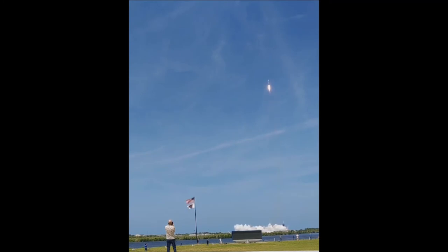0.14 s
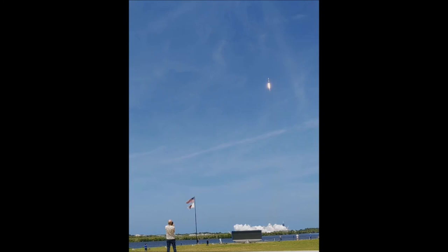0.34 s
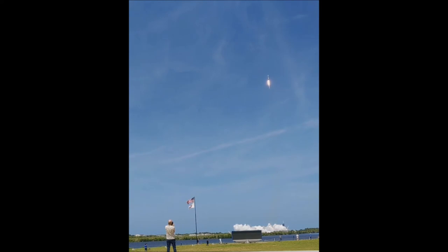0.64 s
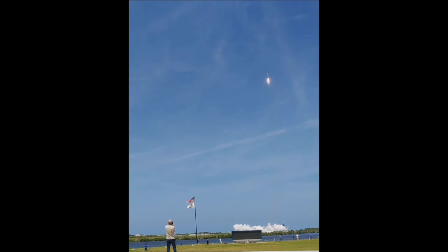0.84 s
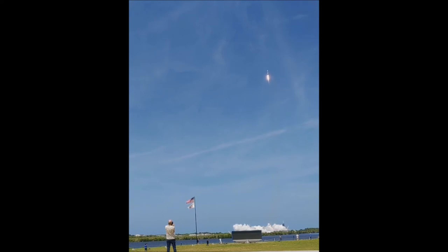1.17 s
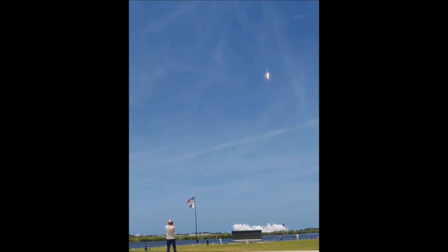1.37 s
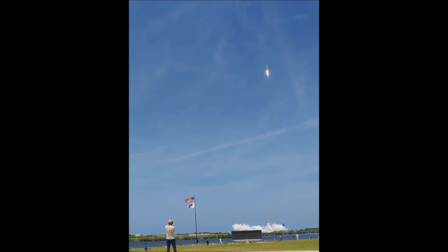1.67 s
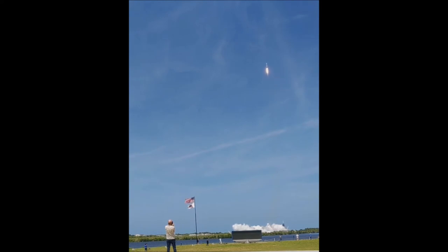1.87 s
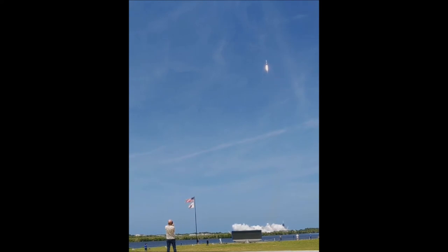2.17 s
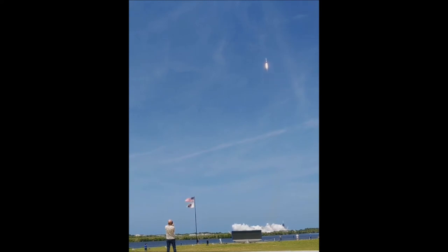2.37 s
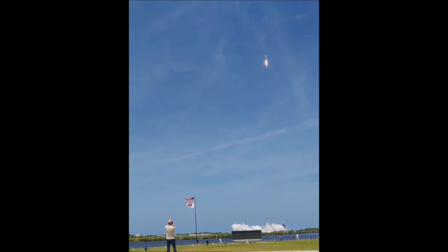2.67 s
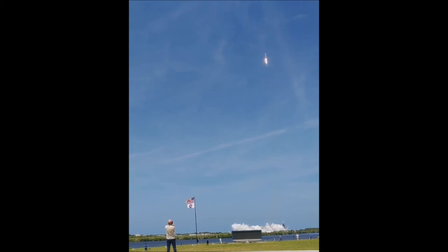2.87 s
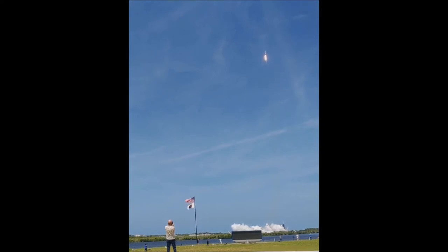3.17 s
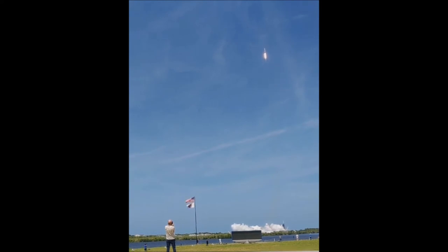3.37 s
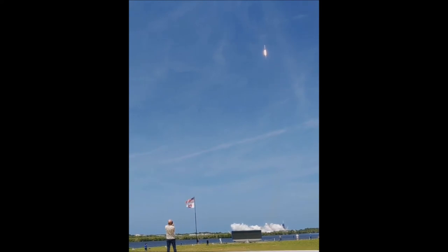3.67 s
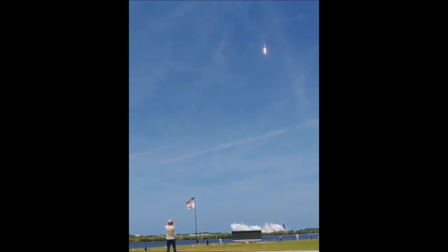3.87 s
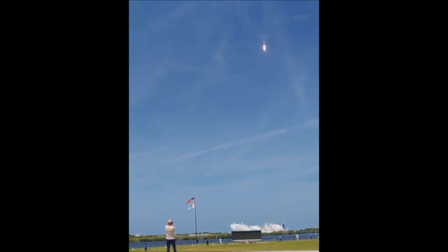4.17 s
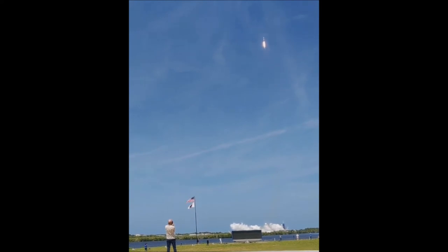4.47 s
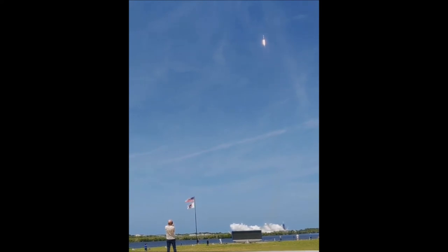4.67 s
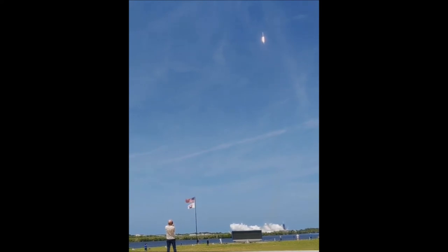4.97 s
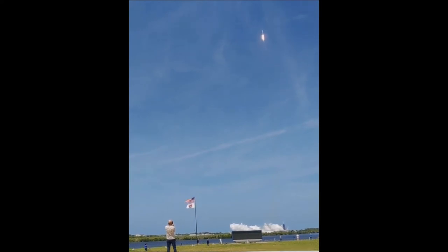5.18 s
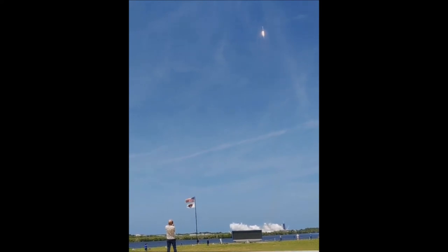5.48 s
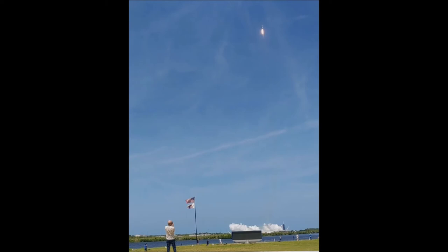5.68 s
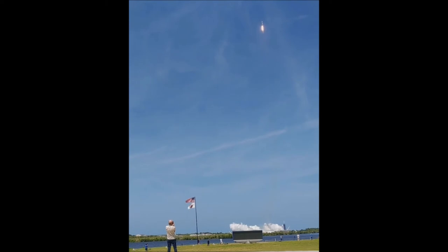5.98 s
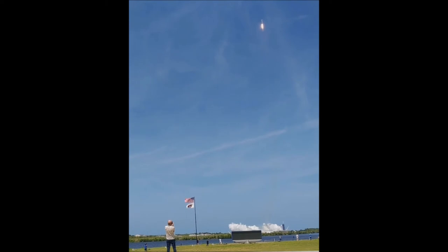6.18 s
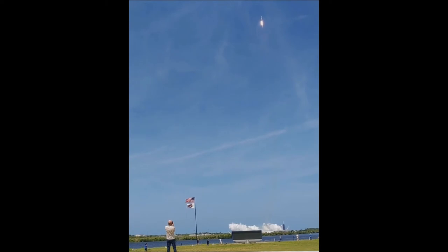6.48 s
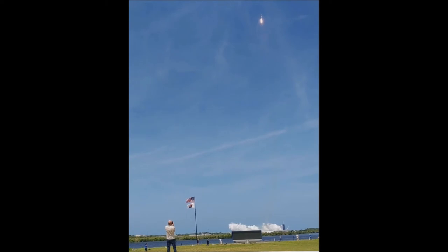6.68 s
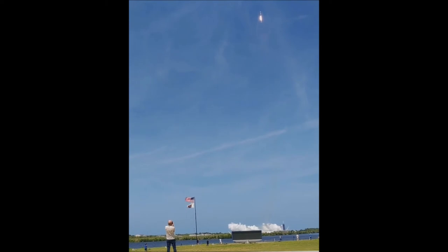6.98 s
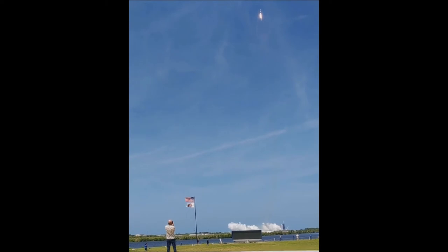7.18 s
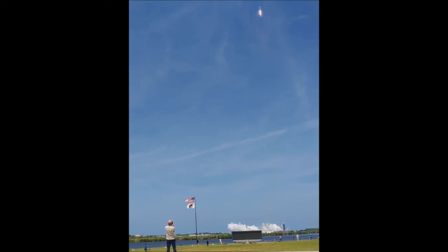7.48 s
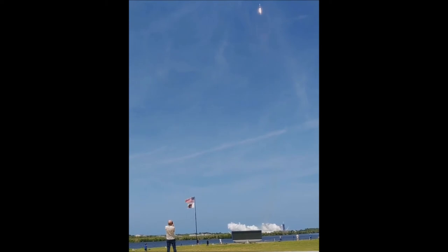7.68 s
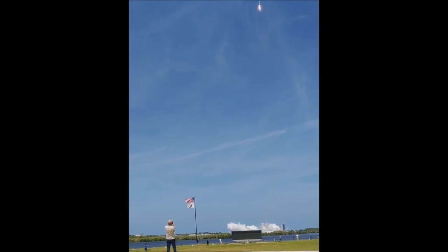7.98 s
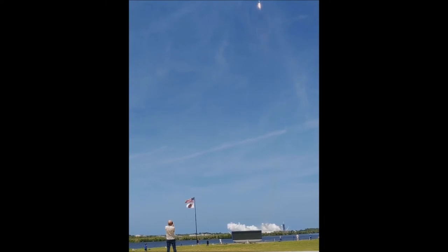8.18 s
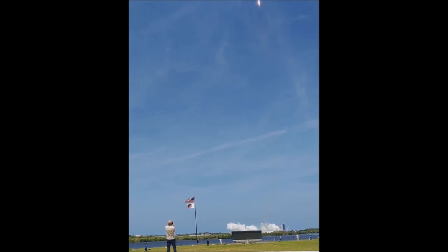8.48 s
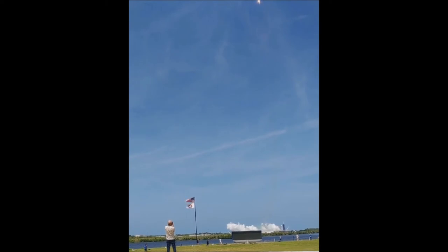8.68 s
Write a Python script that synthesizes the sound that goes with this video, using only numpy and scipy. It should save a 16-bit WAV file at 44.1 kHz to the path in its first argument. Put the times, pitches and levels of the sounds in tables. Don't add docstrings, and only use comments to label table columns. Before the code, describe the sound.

Heavy low-frequency rocket rumble rolls across open ground while dry, tearing crackle builds over it, peaks about six seconds in, then recedes a little.

```python
import sys
import numpy as np
from scipy import signal
from scipy.fft import rfft, irfft, next_fast_len
from scipy.io import wavfile
from scipy.ndimage import uniform_filter1d, minimum_filter1d

SR = 44100
rng = np.random.default_rng(int(sys.argv[2]) if len(sys.argv) > 2 else 0)


def volts_from_decibels(level):
    exponent = np.asarray(level, float) / 20
    return 10 ** exponent


def store_pcm(level_fs):
    pcm = np.round(np.clip(level_fs, -1, 1) * 32767).astype(np.int16)
    wavfile.write(sys.argv[1], SR, np.atleast_2d(pcm).T)


N = 389844
PULSE_PAIR = np.array([[1], [0.6]])


def evened(x):
    return x / np.sqrt(np.mean(x ** 2) + 1e-20)


def read(points, hz):
    f, value = np.transpose(points)
    return np.interp(np.log(hz + 1), np.log(f + 1), value)


def causal(gain_db):
    ceps = irfft(np.maximum(gain_db, -110) * np.log(10) / 20)
    half = ceps.shape[-1] // 2
    ceps[..., 1:half] *= 2
    ceps[..., half + 1:] = 0
    return irfft(np.exp(rfft(ceps)))


def noise(colour, size, patchy_db):
    hz = np.fft.rfftfreq(size, 1 / SR)
    a, b, c, d, patch = rng.standard_normal((2 * N // size + 3, len(hz), 5), dtype=np.float32).T
    patch = evened(uniform_filter1d(uniform_filter1d(patch, size=6, axis=0), size=3, axis=1))
    gain = volts_from_decibels(read(colour, hz)[:, None] + patchy_db * patch)
    z = np.array([a + 1j * b, c + 1j * d]) * gain
    return evened(signal.istft(z, window="cosine", nperseg=size)[1][:, :N])


# time in seconds, loudness in dB, depth in dB moved from throb to
# lowest rumble, shock strength in dB.
JET_COURSE = [(0, -18.5, 2, -74), (.06, -19, -2.5, -64), (.65, -17.5, 0.5, -63.5), (1.3, -18, -1, -63.5),
              (2.1, -16, 0, -61.5), (2.75, -15.5, -1.5, -56), (3.35, -17, -1.5, -57),
              (3.85, -17.5, -1, -52.5), (4.4, -17, -1.5, -48), (4.95, -17.5, 1.5, -53),
              (5.5, -19, -0.5, -50), (6.1, -11.5, 1.5, -45), (6.27, -13.5, -1, -49),
              (6.47, -17.5, 1.5, -59.5), (6.56, -18.5, -1, -50.5), (7.2, -16.5, 0, -48.5),
              (8.0, -16, 0, -51), (8.84, -18, 3, -52.5)]


def control(column, t):
    return np.interp(t, np.array(JET_COURSE)[:, 0], np.array(JET_COURSE)[:, column])


# frequency in Hz, level in dB.
MICROPHONE_HISS = [(1500, -19), (3000, 0.5), (6000, -9.5), (9000, -4), (16000, -11)]


def microphone_hiss():
    return volts_from_decibels(-83.5) * noise(MICROPHONE_HISS, size=1024, patchy_db=0.0)


# start in seconds, level in dB.
DRY_TICKS = [(0.0044, -55), (0.7602, -55), (2.3263, -58), (2.3389, -45), (2.3474, -58), (2.3577, -55.5),
             (2.406, -56), (3.5104, -49), (5.366, -28), (5.5777, -27), (5.643, -38), (6.25, -46),
             (6.349, -39), (7.4105, -52), (7.856, -51.5), (8.249, -50.5), (8.472, -49.5), (8.66, -54)]


def ticks():
    out = np.zeros((2, N))
    for s, db in DRY_TICKS:
        first = round(s * SR)
        out[:, first:first + 3] += volts_from_decibels(db + 8.5) * np.array([1, -0.6, -0.2])
    return out


# time in seconds, level in dB,
# centre frequency in Hz.
GATHERED_THROB = [(0, -6.5, 125), (1.3, -11.5, 114.8), (2.25, -5.5, 97), (2.7, -3, 122.2), (3.0, 1, 110.1),
                  (3.35, 4, 112), (3.75, 0.5, 128), (4.2, -5, 118), (5.2, -6.5, 108.2), (6, -6, 99.5),
                  (7, -3.5, 117.9), (7.8, -6.5, 104.9), (8.84, -4, 115)]
GATHER_WIDTH_HZ, GATHER_STEADY = 20, 0.6


def gathered(t):
    s, _, hz = np.transpose(GATHERED_THROB)
    a, b = rng.standard_normal((2, 2, N))
    slow = signal.sosfilt(signal.butter(2, GATHER_WIDTH_HZ, fs=SR, output="sos"), a + 1j * b)
    slow /= abs(slow) ** GATHER_STEADY + 1e-9
    turns = np.cumsum(np.interp(t, s, hz)) / SR
    return evened((slow * np.exp(2j * np.pi * turns)).real)


# frequency in Hz, level in dB.
RUMBLE_COLOUR = [(8, -14), (16, -8), (27, 0), (40, -1.5), (55, -8), (80, -22), (300, -77.5), (3000, -140)]
THROB_COLOUR = [(30, -32.5), (55, 2.5), (80, -4), (120, -1.5), (200, -11), (400, -19.5), (900, -57.5),
                (3000, -120)]
RUMBLE_DB, THROB_DB, GATHER_DB = -3, -8.5, -11


def rumble():
    t = np.arange(N) / SR
    loud_db, depth_db = control(column=1, t=t), control(column=2, t=t)
    deep = volts_from_decibels(loud_db + depth_db + RUMBLE_DB) * noise(RUMBLE_COLOUR, size=4096, patchy_db=-0.4)
    deep += volts_from_decibels(loud_db - depth_db + THROB_DB) * noise(THROB_COLOUR, size=4096, patchy_db=0.23)
    gather_db = np.interp(t, *np.transpose(GATHERED_THROB)[:2]) + GATHER_DB
    return deep + volts_from_decibels(loud_db + gather_db) * gathered(t)


# frequency in Hz, level in dB.
ROAR_COLOUR = [(80, -37.5), (200, -1), (300, -2), (600, -12), (1000, -21), (1600, -28), (2200, -35.5),
               (5000, -58), (9000, -110)]
ROAR_DB, ROAR_PER_DEPTH, ROAR_PER_SHOCK = -15.5, -0.12, 0.12


def roar():
    t = np.arange(N) / SR
    shock_db = control(column=3, t=t)
    jumps = volts_from_decibels(1.5 * np.minimum(rng.exponential(1, N), 3)) * (rng.random(N) < 110 / SR)
    colour = causal(read(ROAR_COLOUR, np.fft.rfftfreq(4096, 1 / SR)))
    blunt = evened(signal.oaconvolve(jumps, colour)[:N])
    steep = np.clip((shock_db + 60) / 14, 0, 1)
    mix = (1 - 0.35 * steep) * noise(ROAR_COLOUR, size=1024, patchy_db=1.5)
    mix = mix + (0.32 + 0.29 * steep) * blunt * PULSE_PAIR
    bright = signal.lfilter(*signal.butter(1, 450, "high", fs=SR), mix)
    mix = (1 - 0.94 * steep) * mix + 1.28 * steep * bright
    level_db = control(column=1, t=t) + ROAR_DB + ROAR_PER_DEPTH * control(column=2, t=t)
    return volts_from_decibels(level_db + ROAR_PER_SHOCK * (shock_db + 56.0)) * mix


def leaned(jet):
    lean = 0.22 * np.clip((control(column=3, t=np.arange(N) / SR) + 62.0) / 12, 0, 1)
    square = signal.lfilter(*signal.butter(1, 15, "high", fs=SR), jet[0] ** 2)
    return jet + lean * square * np.array([[1], [0]])


# time in
# seconds, level in dB.
HUMP_ROWS = [(1.021, -5.5), (1.106, -14), (1.1258, -10.5), (1.1453, -9), (1.1561, -8.5), (1.1693, -6),
             (1.178, -9), (1.2108, -6.5), (1.2644, -12.5), (1.321, -10.5), (1.3684, -8),
             (1.4276, -8.5), (1.4386, -10.5), (1.4859, -8), (1.5104, -14.5), (1.53, -14.5),
             (1.5334, -9), (1.6925, -7), (1.6965, -8), (1.779, -8.5), (1.8103, -10.5),
             (1.8429, -14.5), (1.883, -13.5), (1.915, -10), (1.9195, -10), (1.9558, -20.5),
             (1.9958, -11.5), (2.003, -6.5), (2.153, -11.5), (2.172, -16.5), (2.1964, -6.5),
             (2.2589, -7), (2.2807, -16), (2.31, -3.5), (2.3273, -10), (2.39, -12.5), (2.4082, -20.5),
             (2.472, -13.5), (2.5123, -7.5), (2.5418, -14.5), (2.6825, -7.5), (2.6945, -8.5),
             (2.7094, -6), (2.7862, -6.5), (2.7957, -1.5), (2.8302, -9), (2.889, -15), (3.0637, -2.5),
             (3.1316, -10.5), (3.174, -12.5), (3.2079, -7.5), (3.2374, -18), (3.2689, -13.5),
             (3.283, -19), (3.3222, -10.5),
             (3.4113, -11.5), (3.471, -10), (3.4863, -11.5), (3.5303, -11.5), (3.58, -11),
                     (3.5961, -13), (3.6349, -5.5), (3.6796, -7), (3.695, 2), (3.7184, -8), (3.8064, -12),
                     (3.8296, -9), (3.8589, -8.5), (4.1221, -19.5), (4.147, -11), (4.2182, -4.5),
                     (4.2354, -12), (4.257, -4.5), (4.3333, -12), (4.3521, -10), (4.4165, -7),
                     (4.4334, -10.5), (4.4557, -8), (4.477, -14), (4.4839, -4.5), (4.503, -8.5),
                     (4.5201, -2), (4.5872, -5), (4.5984, -9.5), (4.6166, -14), (4.638, -6.5), (4.649, 0.5),
                     (4.6936, -5), (4.7631, -13), (4.7766, -10.5), (4.7938, -19), (4.81, -1.5),
                     (4.833, -6.5), (4.8846, -10.5), (4.8994, -15), (4.9255, -16), (4.9624, -6.5),
                     (4.9825, -8), (4.998, -6.5), (5.0841, -1), (5.125, -11.5), (5.1538, -7),
                     (5.1847, -19.5), (5.2402, -19.5), (5.2872, -11), (5.3576, -15), (5.3788, -8.5),
                     (5.393, -6), (5.415, -6), (5.4232, -13.5), (5.4534, -13),
             (5.488, -16.5), (5.5985, -8.5), (5.6169, -3), (5.656, -17), (5.6764, -6),
                      (5.6822, -2.5), (5.822, -8), (5.8412, -16.5), (5.887, -10), (5.902, -9.5),
                      (5.921, -17.5), (5.9247, -5.5), (5.945, -16.5), (5.974, -3), (6.0173, -8.5),
                      (6.0166, 1.5), (6.0724, -6), (6.0782, -8.5), (6.1005, -7.5), (6.1343, -8),
                      (6.1595, -11), (6.166, -14.5), (6.1752, -9), (6.1811, -4), (6.2226, -6),
                      (6.2279, -14), (6.258, -14.5), (6.2945, -6.5), (6.3264, -9.5), (6.3585, -11.5),
                      (6.3891, -12.5), (6.4194, -10.5), (6.4988, -10), (6.5878, -2.5), (6.5953, -6),
                      (6.677, -18.5), (6.7258, -5.5), (6.9, -18), (6.9293, -4.5), (6.9645, -24.5),
                      (7.156, -15.5), (7.2088, -14.5), (7.247, -9), (7.4914, -17.5), (7.542, -16.5),
                      (7.557, -15.5), (7.5858, -9), (7.8461, -13), (7.9235, -12), (7.9515, -12.5),
                      (8.5853, -11.5)]
HUMP_S, HUMP_BAND_HZ, HUMP_DB, HUMP_DIRECT = 0.0012, [119, 1090], -0.5, 0.76
PULSE_PER_LOUD = 0.58
TWIN_S = 0.00895


def humps():
    s, db = np.transpose(HUMP_ROWS)
    size = volts_from_decibels(db + HUMP_DB + PULSE_PER_LOUD * (control(column=1, t=s) + 19.5))
    train, t = np.zeros(N), np.arange(-1024, 1025) / SR
    np.add.at(train, (s * SR).astype(int), size)
    np.add.at(train, ((s - TWIN_S) * SR).astype(int), HUMP_DIRECT * size)
    band = signal.butter(1, HUMP_BAND_HZ, "band", fs=SR)
    hump = signal.filtfilt(*band, np.exp(-abs(t) / HUMP_S))
    return signal.oaconvolve(train, hump, "same") * PULSE_PAIR


def swings(rows, hz, rise_s, gain_db):
    out, t = np.zeros(N), np.arange(400) / SR
    for (s, db), wide in zip(rows, rng.uniform(0.62, 1.24, len(rows))):
        swing = np.sin(2 * np.pi * hz * wide * t) * t / rise_s * np.exp(1 - t / rise_s)
        loud_db = PULSE_PER_LOUD * (control(column=1, t=s) + 17)
        first = round(s * SR)
        out[first:first + 400] += volts_from_decibels(db + gain_db + loud_db) * swing
    return out * PULSE_PAIR


# start in seconds, level in dB.
KNOCK_ROWS = [(4.397, -22.5), (4.561, -25), (4.614, -14), (4.633, -19.5), (4.689, -22), (4.722, -33),
              (4.856, -29), (4.871, -24), (4.914, -35), (4.998, -23), (5.116, -24), (5.175, -28),
              (5.215, -43), (5.349, -25), (5.358, -25), (5.413, -18), (5.421, -14), (5.453, -13),
              (5.486, -19), (5.507, -23), (5.516, -17), (5.567, -17.5), (5.595, -24), (5.669, -27),
              (5.702, -21.5), (5.716, -21.5), (5.758, -24), (5.765, -20), (5.812, -22), (5.947, -30),
              (6.004, -13), (6.014, -27.5), (6.157, -19), (6.293, -22), (6.341, -27), (6.361, -18),
              (6.492, -24), (6.578, -36), (6.586, -31), (6.703, -27), (6.758, -18), (6.793, -24),
              (6.8, -18), (6.963, -24), (7.024, -28), (7.157, -21), (7.205, -33.5)]


def knocks():
    return swings(KNOCK_ROWS, hz=800, rise_s=0.0011, gain_db=-4)


# start in seconds, level in dB.
SNAP_ROWS = [(4.7238, -23.5), (4.808, -22), (4.881, -21), (4.8967, -18), (4.9965, -20), (5.0335, -27),
             (5.0819, -22), (5.124, -27), (5.1824, -24), (5.235, -21), (5.2774, -31), (5.2838, -24),
             (5.652, -32), (5.7724, -27), (5.888, -27), (6.069, -19.5), (6.6697, -27), (6.8296, -26),
             (7.035, -29), (7.2906, -30), (7.4774, -22), (7.705, -28), (7.7242, -20), (7.92, -31),
             (8.0315, -25), (8.093, -25), (8.1913, -23), (8.4976, -26)]


def snaps():
    return swings(SNAP_ROWS, hz=1350, rise_s=0.00054, gain_db=-0.5)


# frequency in Hz, gain in dB.
PORT_COLOUR = [(800, -2.5), (1500, -0.5), (2100, -4), (2600, -1), (3400, 0), (4700, -6), (5300, -1),
               (5850, 1.5), (6350, -7), (7600, -6), (8600, -14.5), (9500, -12), (10500, -18), (16000, -21)]


def crackle():
    clump = evened(uniform_filter1d(uniform_filter1d(rng.standard_normal(N), size=900), size=900))
    size = volts_from_decibels(1.2 * np.minimum(rng.exponential(1, N), 4) + 0.5 * clump)
    train = size * (rng.random(N) < 260 / SR)
    keep = volts_from_decibels(-120 / (0.15 * SR))
    envelope = np.sqrt(signal.lfilter([1 - keep], [1, -keep], train ** 2))
    hiss = envelope * rng.standard_normal((2, N))
    field = evened(train * PULSE_PAIR + volts_from_decibels(8.0) * hiss)
    hz, t, z = signal.stft(field, SR, nperseg=256)
    slope_db = read([(300, -22.0), (900, 11.0), (3000, 8.5), (8000, -0.5)], hz) + read(PORT_COLOUR, hz)
    top = read([(3500, 0.037), (9000, 0.82)], hz)[:, None]
    level_db = control(column=3, t=t)
    top_db = 1.04 * (level_db + 49.0) - 3.0
    z *= volts_from_decibels(slope_db[:, None] + level_db + 2.5 + top * top_db)
    return signal.istft(z, SR, nperseg=256)[1][:, :N]


# time in seconds, crack in dB, edge in dB relative to it, body in dB relative to it.
SHOCK_ROWS = [(0.146, -45, -29.5, 1), (0.27, -43.5, -34, 19), (0.402, -46.5, -34, 14),
              (0.5196, -44, -21, 12), (0.878, -44.5, -31, 21), (0.9776, -44.5, -31, 14),
              (1.1392, -44.5, -25, 13), (1.424, -48, -10, 21), (2.1963, -43, -29.5, 15.5),
              (2.3793, -55.5, -18.5, 9), (2.5948, -53, -27, 4), (2.6297, -43, -37, 15.5),
              (2.87, -44.5, -33, 11), (2.994, -42.5, -41, 9), (3.063, -43.5, -26, 3.5),
              (3.2193, -40.5, -43, 9), (3.237, -44, -44, 1), (3.4133, -39, -32, 2),
              (3.441, -40.5, -30, 12), (3.4658, -40, -38, 3.5), (3.6988, -37.5, -31, 10.5),
              (3.7414, -41.5, -33, 1.5), (3.8035, -40.5, -36, 7), (3.8287, -39.5, -39, 6.5),
              (3.87, -39, -35, 7), (3.9, -39, -32, 9), (3.9299, -39, -28, 5.5), (4.014, -55.5, -28, -7),
              (4.095, -51, -20, -9), (4.1195, -38.5, -23, 2.5),
              (4.2148, -35.5, -29, 1), (4.2339, -33.5, -39, 3.5), (4.2868, -31, -23, -4),
                  (4.3975, -28, -29, 0), (4.4687, -35, -40, 10.5), (4.5225, -26, -27, -1.5),
                  (4.6193, -24, -28, 5.5), (4.6357, -27.5, -20, -6), (4.6899, -27, -16, -8.5),
                  (4.7257, -36.5, -31, 4.5), (4.8245, -38, -36, 11), (4.8817, -27.5, -29, 4),
                  (4.8965, -32, -23, 10.5), (4.9235, -28, -23, 10), (4.962, -38.5, -31, 11),
                  (4.9954, -31, -27, -1), (5.084, -26.5, -18, -10.5), (5.1229, -36.5, -23, 10.5),
                  (5.153, -38.5, -27, 5), (5.1834, -29, -21, -0.5), (5.217, -24, -22, -4),
                  (5.2367, -26, -14, -2.5), (5.2852, -35, -21, 1.5), (5.3575, -24.5, -13, 2),
                  (5.377, -25.5, -14, 5), (5.3904, -35.5, -15, 4.5), (5.42, -31, -7, -7),
                  (5.4556, -27, -15, -10), (5.49, -34, 0, -7), (5.5181, -27, -16, -8.5),
              (5.5384, -35, -9, 5), (5.5696, -22, -9, -11), (5.5955, -29.5, -10, 5),
                    (5.6176, -30, -10, 7.5), (5.6558, -34.5, -17, 10.5), (5.6932, -36, -17, 7),
                    (5.726, -39.5, -30, 16.5), (5.7733, -23.5, -18, -10.5), (5.8225, -26, -24, -0.5),
                    (5.9072, -30, -32, 8), (5.9206, -32, -36, 12), (5.969, -30.5, -34, 9.5),
                    (6.0128, -15.5, -15, -5.5), (6.0712, -24, -24, 1), (6.102, -22, -32, 11),
                    (6.1641, -23.5, -30, 2), (6.1753, -25, -28, 3.5), (6.229, -35.5, -28, 11),
                    (6.3639, -27.5, -26, 3), (6.4901, -27.5, -18, -2.5), (6.4972, -23, -15, -12.5),
                    (6.5288, -33.5, 5, -21), (6.588, -25, -19, 3), (6.6323, -31.5, -12, 0.5),
                    (6.6719, -26.5, -23, -6.5), (6.7151, -31, -23, 3), (6.802, -28, -30, -2),
                    (6.839, -34.5, -31, 8), (6.8968, -32.5, -26, 3.5), (6.964, -31, -31, 0),
                    (6.9882, -34, -39, 8.5), (7.037, -38.5, -40, 18),
              (7.0948, -28, -34, 5), (7.1683, -34.5, -32, 8), (7.2161, -30, -37, 14),
                   (7.2341, -31.5, -34, 5), (7.2683, -33.5, -30, 6), (7.3011, -27.5, -22, 0.5),
                   (7.403, -41.5, -23, 10), (7.4909, -25, -23, 6.5), (7.541, -35, -31, 15),
                   (7.653, -34.5, -31, -9), (7.7243, -32.5, -41, 3.5), (7.8092, -39.5, -29, 6.5),
                   (7.9188, -38, -43, 14), (7.9902, -40, -21, -7), (8.0402, -30, -38, -4),
                   (8.1016, -32.5, -27, 4), (8.1742, -29.5, -36, -3), (8.1943, -24, -37, -4),
                   (8.2326, -35, -19, 5.5), (8.285, -32, -32, -1), (8.362, -27.5, -41, -7),
                   (8.4261, -32.5, -34, 1.5), (8.497, -39.5, -31, 2), (8.547, -34, -42, -0.5),
                   (8.5771, -27.5, -41, -0.5), (8.595, -27.5, -30, 5.5), (8.6406, -39, -19, 6.5),
                   (8.68, -32, -29, 1), (8.7243, -31.5, -30, -2.5), (8.774, -31.5, -33, -6.5)]
DIRECT_DB, DIRECT_THUD_DB, DIRECT_EDGE_DB, DIRECT_HISS_DB = -5.5, 2.5, -1, -8
THUD_DB, THUD_SHARE, THUD_TOP_DB = 3.5, 0.79, -22.5


def arrivals():
    rows = SHOCK_ROWS
    s, crack_db, edge_db, body_db = np.tile(np.transpose(rows), 2)
    direct = np.repeat([1, 0], len(rows))
    crack_db = crack_db + DIRECT_DB * direct
    thud_db = THUD_DB + THUD_SHARE * body_db + DIRECT_THUD_DB * direct
    thud_db = np.minimum(thud_db, THUD_TOP_DB - crack_db)
    edge_db = edge_db + 2.5 + DIRECT_EDGE_DB * direct
    return s - TWIN_S * direct, crack_db, thud_db, edge_db, DIRECT_HISS_DB * direct


# frequency in Hz, abruptness from 0 to 1.
FRONT_ABRUPTNESS = [(300, 0.4), (1200, 0.93)]
# frequency in Hz, phase in radians.
FRONT_TWIST = [(350, 0), (800, -1.5), (3000, -1.5)]
EARLY = 400


def front_spectra(crack_db, thud_db, edge_db, hz, top):
    shape_db = read([(25, 1.0), (90, 23.5), (220, 10.0), (500, 12.5), (1200, -3.5), (2000, -5),
                     (16000, -10.0)], hz) + read(PORT_COLOUR, hz)
    low = read([(1500, 0.83), (2800, 0.13)], hz)
    shape_db = shape_db + np.outer(thud_db + 6.5, low) + np.outer(edge_db + 17.5, top)
    dull = read([(3500, 0), (6000, 1.8)], hz)
    shape_db += np.outer(np.minimum(crack_db + 37.0, 0), dull)
    jumps = rfft(causal(shape_db + crack_db[:, None] + 24.5))
    phase = np.angle(jumps) * np.clip(read(FRONT_ABRUPTNESS, hz), 0, 1) + read(FRONT_TWIST, hz)
    return abs(jumps) * np.exp(1j * (phase - 2 * np.pi * hz * EARLY / SR))


# frequency in Hz, level in dB.
SCATTERED_HISS = [(300, -9), (1200, -0.5), (2500, 6), (6000, 6), (12000, 4)]
SWELL_S, TOP_T60_S = 0.022, 0.061
SMEARED_DB, FRONT_LATE_S = 3, 0.001008


def fronts():
    s, crack_db, thud_db, edge_db, hiss_db = arrivals()
    hz, t = np.fft.rfftfreq(8192, 1 / SR), np.arange(8192) / SR
    top = read([(6500, 0.006), (10000, 0.6)], hz)
    jumps = front_spectra(crack_db, thud_db, edge_db, hz, top)
    brief = volts_from_decibels(-60 * t / TOP_T60_S) * (1 - np.exp(-t / 0.00099))
    fade = volts_from_decibels(-60 * t / 0.044) + volts_from_decibels(-8.5 - 60 * t / 0.23)
    fade *= signal.windows.tukey(16384, 0.4)[8192:] * (1 - np.exp(-t / 0.0009))
    swell = t / SWELL_S * np.exp(-t / SWELL_S)
    fade, swell = fade / np.linalg.norm(fade), swell / np.linalg.norm(swell)
    clean = np.clip((crack_db + 54.0) / 14, 0.05, 1.05)
    clean *= np.clip((control(column=3, t=s) + 67.0) / 11, 0.1, 1)
    scatter = volts_from_decibels(read(SCATTERED_HISS, hz))
    lasting, fleeting = scatter * (1 - top), scatter * top / np.linalg.norm(brief)
    starts = ((s + FRONT_LATE_S) * SR).astype(int) - EARLY
    out = np.zeros((2, N + 8192))
    for start, jump, db, share in zip(starts, jumps, hiss_db, clean):
        puff = rng.standard_normal((2, 8192))
        sharp = min(share, 1)
        envelope = swell + sharp ** 2 * (fade - swell)
        hiss = lasting * rfft(puff * envelope) + fleeting * rfft(puff * brief)
        paths = share * PULSE_PAIR + hiss * volts_from_decibels(db + SMEARED_DB * (1 - sharp))
        out[:, start:start + 8192] += irfft(jump * paths)
    return out[:, :N]


def ground(x, share, dull_hz):
    b, a = signal.butter(2, dull_hz, fs=SR)
    delay = round(0.00866 * SR)
    late = np.pad(signal.lfilter(b, a, x), ((0, 0), (delay, 0)))[:, :N]
    return x + share * late


# frequency in Hz, share of sound common to both from 0 to 1.
PORT_LIKENESS = [(30, 1), (120, 0.97), (270, 0.87), (500, 0.84), (1300, 0.85), (2200, 0.43), (6000, 0),
                 (15000, 0.35)]
# frequency in Hz, left minus right in dB.
PORT_BALANCE = [(60, 0), (120, 0.5), (240, -1), (480, 1), (950, 1.5), (1890, 4.5), (3770, 1.5), (7520, 3.5),
                (15000, -1.5)]
# frequency in Hz, lead of the left in radians.
PORT_LEAD = [(20, 0), (120, -0.2), (430, -.8), (1500, -0.96), (2300, -2.5), (4300, -1.5), (8000, -5.5),
             (16000, -8.5)]


def ports(pair):
    length = next_fast_len(N, real=True)
    length += length % 2
    hz = np.fft.rfftfreq(length, 1 / SR)
    common, unrelated = rfft(pair, length)
    angle = np.arccos(np.clip(read(PORT_LIKENESS, hz), 0, 1)) / 2
    tilt = volts_from_decibels(read(PORT_BALANCE, hz) / 2) * np.exp(0.5j * read(PORT_LEAD, hz))
    left = np.cos(angle) * common + np.sin(angle) * unrelated
    right = np.cos(angle) * common - np.sin(angle) * unrelated
    return irfft(np.array([left * tilt, right / tilt]))[:, :N]


def scene():
    jet = leaned(rumble() + roar())
    air = ground(jet + crackle(), share=0.51, dull_hz=820)
    air += humps() + knocks() + snaps() + fronts()
    return ports(air) + ticks() + microphone_hiss()


def low_pass(x):
    return signal.sosfilt(signal.butter(12, 15840, fs=SR, output="sos"), x)


def record(dry):
    peak_db = 20 * np.log10(abs(dry).max(0) + 1e-9)
    fall = np.arange(N) * 128.0 / SR
    over_db = np.maximum(np.maximum.accumulate(peak_db + fall) - fall + 9.0, 0)
    over_db = -minimum_filter1d(-over_db, size=129)
    over_db = uniform_filter1d(uniform_filter1d(over_db, size=65), size=65)
    block = np.floor((np.arange(N) / SR - 0.00107) / (512 / 48000)).astype(int)
    step_db = 0.11 * rng.standard_normal(N // 400)[block + 1]
    held = dry / volts_from_decibels(over_db + step_db)
    soft = 0.5 * np.tanh(held / 0.45 * 1.198)
    edge = signal.firwin(1023, 15850, window=("kaiser", 9), fs=SR)
    mix = signal.oaconvolve(soft, edge[None], "same", axes=1)
    return low_pass(mix)


dry = scene()
out = record(dry)
store_pcm(out)
```